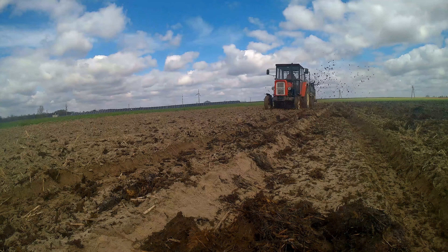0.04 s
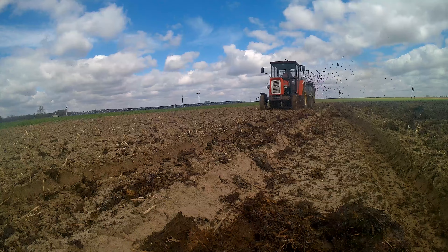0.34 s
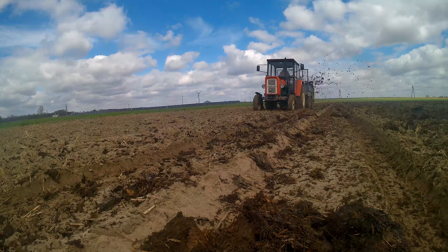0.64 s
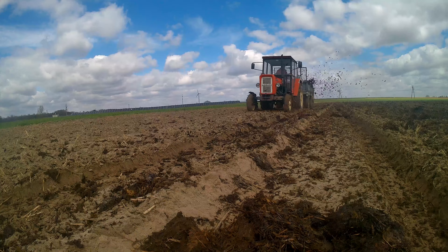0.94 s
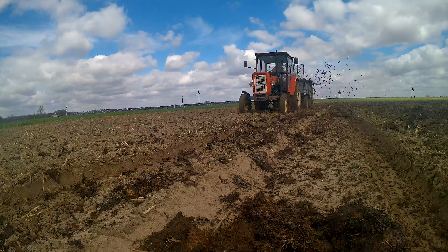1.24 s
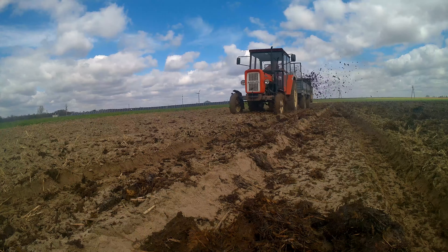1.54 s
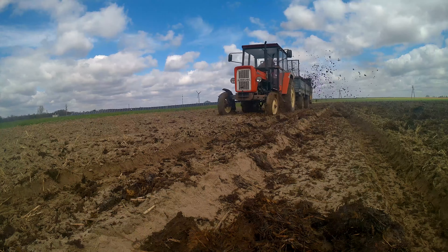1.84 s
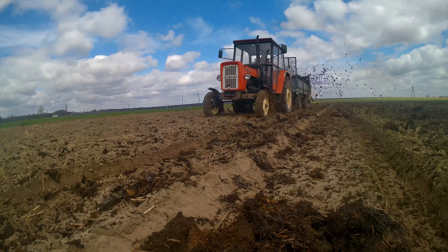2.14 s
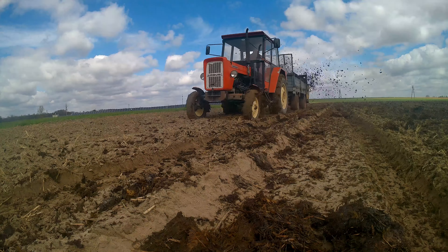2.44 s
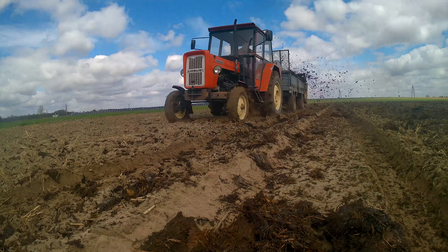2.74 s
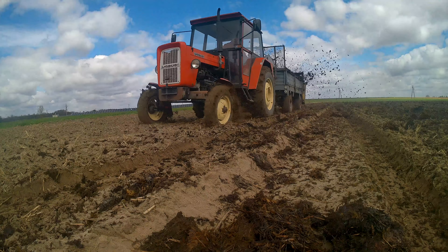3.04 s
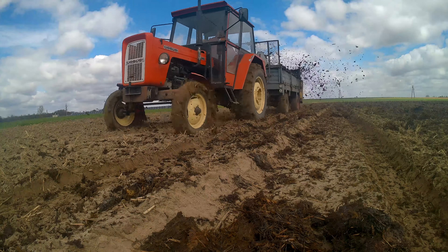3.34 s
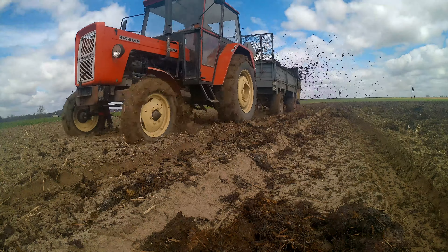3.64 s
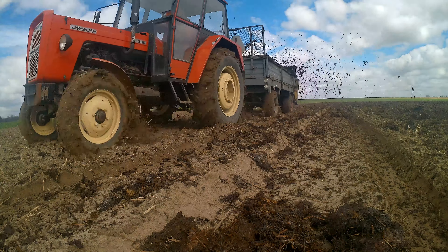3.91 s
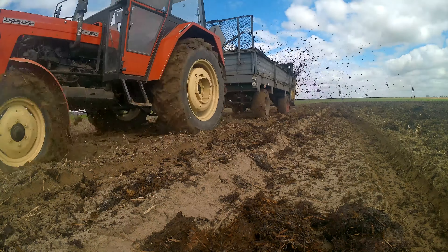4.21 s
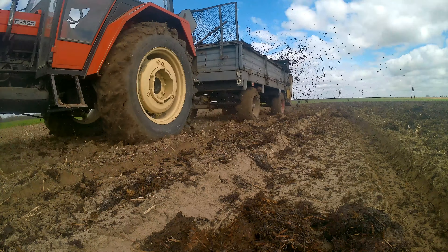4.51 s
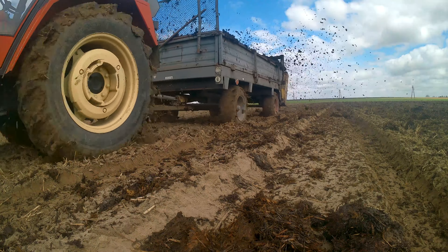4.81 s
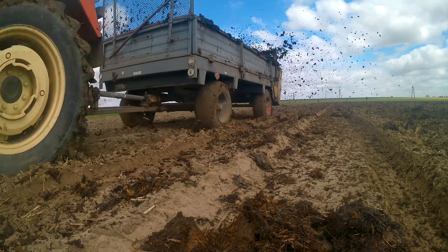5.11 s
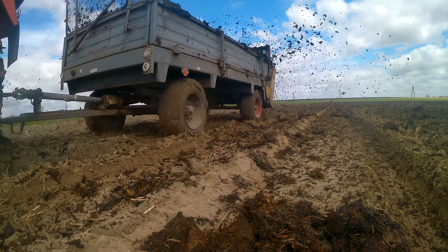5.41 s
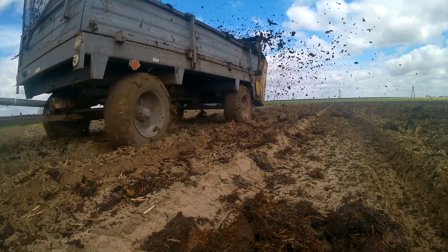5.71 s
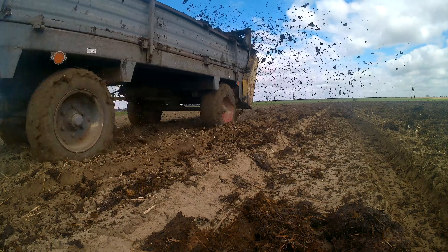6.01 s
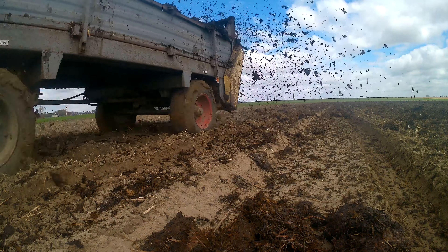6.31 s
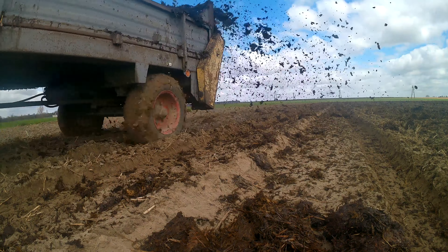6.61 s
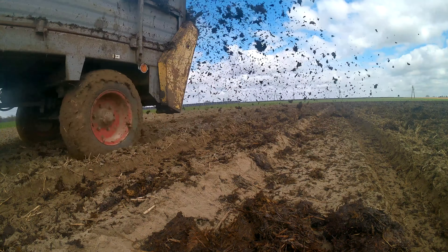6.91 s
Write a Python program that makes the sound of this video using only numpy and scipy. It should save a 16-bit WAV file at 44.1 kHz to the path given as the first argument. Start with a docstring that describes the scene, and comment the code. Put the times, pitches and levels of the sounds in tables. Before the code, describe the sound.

Heard from ground level in an open field with faint wind, a tractor's diesel engine drones and rattles steadily closer. As it goes by a few metres away, the tone changes and drops slightly. A towed spreader follows and dulls the engine sound, bringing a low rumble, churning beaters and crunching soil. Near the end, several flung clods spatter and thud close by.

```python
"""Tractor and manure spreader passing

Open field, light breeze, microphone on the ground. A four-cylinder diesel drives up under load and
passes about 2.5 m away: the exhaust drones, the block knocks, the injectors clatter. Its colour changes
as it goes by and its pitch sags with the load. The towed spreader then hides the engine: its beaters
churn, its body rumbles and clods drop on the soil."""
import sys
import numpy as np
from scipy import signal
from scipy.fft import rfft, irfft, next_fast_len
from scipy.io import wavfile
from scipy.ndimage import map_coordinates

SR = 44100
rng = np.random.default_rng(int(sys.argv[2]) if len(sys.argv) > 2 else 0)


def wrap_up_sound(samples):
    """Save the sound to the file named by the first command line argument, as 16-bit audio."""
    columns = np.atleast_2d(samples).T
    # keep every value between -1 and 1, then stretch to whole-number steps
    tamed = np.clip(columns, -1, 1)
    steps = np.round(tamed * 32767).astype(np.int16)
    wavfile.write(sys.argv[1], SR, steps)


N = 306495
DRIVE_M_PER_S = 1.806
ENGINE_PASS_S, ENGINE_MISS_M = 4.38, 2.485  # when and how near it passes the microphone
SPREADER_PASS_S, SPREADER_MISS_M = 6.5, 3.73
RUMBLE_DB, CHURN_DB, CRUNCH_DB = -32, -29, -40.3  # the spreader at its nearest
WALL_S, WALL_HALF_S = 5.5, 0.18  # the trailer's front wall faces the microphone
TOP_HZ = 15720

# Engine speed holds, then sags under the load. Each row: time in seconds, firings per second.
FIRING_RATE = [(0.0, 75.95), (0.6, 75.21), (1.5, 74.97), (2.5, 75.97), (3.0, 76.08), (3.6, 76.94),
               (4.15, 76.88), (4.65, 70.73), (5.3, 70.54), (5.55, 71.95), (5.85, 68.64), (6.95, 67.71)]
# Weak exhaust lines from unequal cylinders. Each row: multiple of the firing rate, then level in dB
# against the firing tone from far ahead, close ahead and behind.
SIDE_ORDERS = [(.5, -25, -31, -24), (.75, -28, -24, -27), (1.25, -19, -21, -16), (1.5, -20, -21, -17.5),
               (1.75, -22, -20.5, -13.5), (2.25, -24.5, -25, -19.5), (2.5, -24.5, -23, -24),
               (2.75, -27, -23.5, -22.5), (3, -25, -27, -19), (4, -28, -29, -20.5), (4.5, -30, -17.5, -25),
               (4.75, -24, -32, -23.5), (5.5, -28.5, -25.5, -36), (7.75, -31, -23, -23.5),
               (8.75, -25, -25, -35), (9.75, -23, -23, -32), (8, -32, -29, -26.5), (10.75, -39, -17.5, -32)]
# The cylinders in firing order. Each row: relative bark, knock and clatter in dB.
CYLINDERS = [(-7.5, -3, -4), (-1.5, -4.5, -3.5), (-7.5, -4.5, -3), (-4, -8, -4)]
# Extra hard combustions. Each row: start in seconds, level in dB.
HARD_KNOCKS = [(1.500, -13), (1.716, -16), (2.191, -12), (2.459, -13), (2.513, -10), (3.454, -7),
               (3.506, -5.5), (3.75, -14), (4.012, -10), (4.130, -6), (5.180, -11)]
# The block's ring. Each row: pitch in Hz, relative level in dB, seconds to fall 60 dB.
BLOCK_MODES = [(1360, -20, .035), (1556, 4.5, 0.037), (1670, -2, 0.015)]
# Tin covers and fuel pipes ringing with the clatter. Each row: pitch in Hz, width in Hz, relative dB.
TIN_MODES = [(3032, 143, -10), (3385, 62, -8.5), (4540, 55, -3), (6140, 240, 0), (6770, 210, 2.5),
             (7470, 170, 2), (9060, 300, -6)]

# Side facing the microphone. Each row: time in seconds, side (0 far ahead, 1 close ahead, 2 abreast,
# 3 behind).
VIEW = [(2.15, 0), (3.35, 1), (4.1, 1.36), (4.38, 2), (4.65, 2), (5, 3)]
# Exhaust bark, block knock and injector clatter from each side. Each row: frequency in Hz, relative dB.
BARK_FAR = [(110, -65), (190, -19), (232, -23), (259, -23), (290, -8.5), (375, -6.5), (405, 0.5),
            (454, -17.5), (716, -2.5), (829, 0.5), (930, -13.5), (1200, -8), (1560, -41), (2640, -120)]
BARK_CLOSE = [(110, -41), (190, -8), (220, -4), (259, -15), (349, 0), (451, -11), (581, -3), (699, -6.5),
              (835, 1), (997, -9.5), (1200, -7), (1560, -30), (2640, -120)]
BARK_ABREAST = [(110, -35), (190, -5), (247, -13), (302, 0), (360, -9), (398, 1), (437, -23), (476, -5.5),
                (804, -6), (974, -18.5), (1200, -1.5), (1560, -19), (2640, -120)]
BARK_BEHIND = [(110, -34), (190, -14), (217, 2), (243, -13), (279, -8), (344, 1), (414, -19), (564, 0),
               (861, -1), (1200, -3), (1560, -20), (2640, -120)]
KNOCK_FAR = [(620, -30.5), (1050, -17.5), (1170, -13.5), (1320, -4), (1430, -9), (1530, -7.5), (1620, 1.5),
             (1850, -10.5), (2130, -10.5), (2510, -25.5), (2700, -21), (3510, -42), (5940, -120)]
KNOCK_CLOSE = [(620, -35), (1050, -18), (1350, -1), (1440, -7.5), (1600, 4.5), (1690, 0), (1890, -14),
               (2050, -8.5), (2160, -16), (2520, -19), (2700, -24), (3510, -16), (5940, -120)]
KNOCK_ABREAST = [(620, -43), (1050, -9.5), (1140, -11), (1230, -17), (1370, 2), (1580, -8.5), (1800, -16),
                 (2020, -12.5), (2490, -24.5), (2700, -21), (3510, -38), (5940, -120)]
KNOCK_BEHIND = [(620, -49.5), (1050, -13.5), (1160, -7.5), (1360, -0.5), (1810, -10), (1900, -3),
                (2000, -9), (2360, -11.5), (2550, -45), (2700, -17.5), (3510, -30), (5940, -120)]
CLATTER_FAR = [(1500, -55), (2550, -17), (2970, 1.5), (3350, 3), (4170, -12), (4570, -11), (4860, -23),
               (5610, -22), (6100, -18), (7100, -41), (9040, -25), (9830, -38), (10600, -28), (12000, -42),
               (15600, -47)]
CLATTER_CLOSE = [(1500, -28.5), (2550, -17.5), (3110, 3), (3610, -5.5), (4680, -13.5), (5280, -29),
                 (6010, -22), (6630, -27), (7540, -24.5), (8130, -29), (8580, -24.5), (10100, -44),
                 (11900, -43), (12900, -52), (15600, -49)]
CLATTER_ABREAST = [(1500, -43), (2550, -11), (2810, 2.5), (3230, -4), (3590, -3.5), (4240, -1.5),
                   (5080, -17), (6050, -18.5), (6830, -29), (7540, -28), (8260, -40), (10400, -28.5),
                   (12200, -34), (12900, -36), (15600, -52)]
CLATTER_BEHIND = [(1500, -6), (2550, -30), (2860, 3.5), (3320, -10), (3590, -8.5), (4210, -2), (4860, -6.5),
                  (5530, -17.5), (6530, -21.5), (8320, -29.5), (10100, -27), (10900, -31.5), (11900, -33),
                  (13400, -46), (15600, -43)]
# Colours of the pipe mouth and the valve gear. Each row: frequency in Hz, relative dB.
PIPE_CRACK = [(300, -11.5), (600, -4.5), (950, -6.5), (1350, 4.5), (1700, -4.5), (2100, -4.5),
              (2600, -20.5), (4000, -24)]
VALVE_TICK = [(4500, -3.5), (6100, -4), (7500, -0.5), (8200, -7.5), (9200, -7.5), (10800, -14),
              (12000, -17), (13000, -28), (15700, -28)]
# What each engine part sends out, as at the nearest distance. Each row: level in dB to far ahead,
# close ahead, abreast and behind.
RADIATES = {"tone": (-17.5, -16.5, -20, -17.3), "octave": (-26.3, -20.5, -25, -26),
            "bark": (-29.3, -26.6, -24.2, -25.4), "knock": (-20.5, -17, -18.5, -16),
            "clatter": (-28.3, -24.5, -29, -26.5), "valves": (-49.3, -43.5, -52, -53)}
# How obstacles act on each part. Each row: share of a wheel's shadow, lift from the trailer's front
# wall in dB, loss behind the trailer in dB.
OBSTACLES = {"tone": (0.92, .8, 9.3), "octave": (0.85, 8.4, 7), "bark": (0.32, 0, 15),
             "knock": (.5, 3, 11.3), "clatter": (0.25, -.5, 17), "valves": (0.31, -.5, 16)}
# Wheels and axles cross the path to the microphone. Each row: centre and half length in seconds,
# full shadow in dB.
WHEEL_SHADOWS = [(3.82, .08, 2.4), (4.37, 0.12, 5.5), (4.706, .09, 3.5), (6.12, .07, 8), (6.34, .06, 8),
                 (6.783, 0.085, 10)]
# The trailer slides in front of the engine. Each row: time in seconds, share hidden.
TRAILER_COVER = [(5.05, 0), (5.86, .4), (5.95, 1)]

# Colours of the spreader's body, beaters and tyres. Each row: frequency in Hz, relative dB.
BODY_RUMBLE = [(50, -59), (85, -6), (140, 1), (221, -8), (329, -7), (367, -12), (436, -7.5), (562, -15.5),
               (650, -26), (840, -41), (1430, -120)]
BEATER_CHURN = [(340, -43), (580, -10.5), (639, -25), (673, -9.5), (785, -15.5), (842, -5.5), (971, -12),
                (1200, -7.5), (1310, 0.5), (1680, -6.5), (1900, -3), (2180, -4.5), (2700, -23), (3510, -41),
                (5940, -120)]
TYRE_CRUNCH = [(1500, -32), (2550, -18), (2970, 4), (3230, -1.5), (3930, -0.5), (4750, -4), (5120, -10),
               (5740, -15.5), (6290, -7), (6780, -14), (7710, -23), (8770, -26), (9760, -27.5),
               (12200, -30), (15600, -39)]
# The spreader swells twice: first rumble and churn surge with the load, then a tyre crunches past.
# Each row: centre and half length in seconds, then extra rumble, churn and crunch in dB.
SPREADER_SWELLS = [(6.168, 0.18, 4, 4.5, 1), (6.807, 0.065, 2, 1, 3)]
# Clods landing. Each row: start in seconds, level in dB, offset for the thump in dB.
CLODS = [(6.032, -27, -10), (6.099, -35.5, 14), (6.514, -34, 5), (6.631, -39, 20), (6.765, -36, 17)]
# The breeze lulls and freshens. Each row: time in seconds, level in dB.
BREEZE = [(1.8, -41.5), (2.5, -46), (4.6, -38)]
# Colour of wind on the microphone. Each row: frequency in Hz, relative dB.
WIND_BUFFET = [(7.1, -32), (12, -17), (38, -13), (55, -7), (72, -24), (120, -120)]


def exhaust(turns):
    """The pipe's drone: firing tone, octave and weak lines from the unequal cylinders."""
    tone_gain, octave_gain = amp(heard_db("tone")), amp(heard_db("octave"))
    view, = curves(VIEW)
    # behind the trailer the drone arrives by shifting detours and wavers
    angle = 2 * np.pi * (turns + 0.007 * wobble(20) + 0.05 * covered() * wobble(25))
    # from ahead the wave has sharp troughs, from behind sharp crests
    skew = np.pi * np.clip(2 - view, 0, 1)
    drone = tone_gain * np.cos(angle) + octave_gain * np.cos(2 * angle - skew)
    lines = 0
    for order, *levels in SIDE_ORDERS:
        db = np.interp(view, [0, 1, 3], levels) + 1.5 * wobble(3.99)
        lines += amp(db) * np.cos(order * angle + 2 * np.pi * rng.random())
    return np.sqrt(2) * (drone + tone_gain * lines)


def engine(turns):
    """Every firing barks from the pipe, knocks the block and rattles the injectors."""
    bark_db, knock_db, clatter_db = np.transpose(CYLINDERS)
    bark = firings(turns, bark_db, lag=.04, t60=.033, rise=.00076, scatter_db=.5, jitter=4e-5, alike=.77)
    bark = scattered(bark, ahead=0.043, behind=0.13, t60=0.053)
    bark = passing(bark, "bark", [BARK_FAR, BARK_CLOSE, BARK_ABREAST, BARK_BEHIND])
    knock = firings(turns, knock_db, lag=.3, t60=.046, rise=.0043, scatter_db=.7, jitter=6e-5, alike=.35)
    knock = scattered(knock, ahead=0.049, behind=0.22, t60=0.09)
    knock = passing(knock, "knock", [KNOCK_FAR, KNOCK_CLOSE, KNOCK_ABREAST, KNOCK_BEHIND])
    clatter = firings(turns, clatter_db, lag=.16, t60=.04, rise=.0061,
                      scatter_db=1.22, jitter=.0004, alike=.077)
    clatter = scattered(clatter, ahead=0.095, behind=0.37, t60=0.067)
    clatter += 1.25 * ringing(clatter, TIN_MODES)
    clatter = passing(clatter, "clatter", [CLATTER_FAR, CLATTER_CLOSE, CLATTER_ABREAST, CLATTER_BEHIND])
    return bark + knock + clatter


def cracks(turns):
    """Heard from behind, the pipe cracks, harder on every other firing."""
    facing = np.clip(curves(VIEW)[0] - 2, 0, 1)
    sizes_db = np.array([-3.5, 0.0, -4, -2.5])
    pulses = firings(turns, sizes_db, lag=-.03, t60=.012, rise=.0006, scatter_db=.8, jitter=5e-5, alike=.5)
    return facing * amp(heard_db("knock") - 3.5) * coloured(pulses, PIPE_CRACK)


def hard_knocks():
    """Now and then a charge ignites late and rings the block."""
    s, db = np.transpose(HARD_KNOCKS)
    t = np.arange(SR // 10) / SR
    phases = 2 * np.pi * rng.random((len(s), len(BLOCK_MODES)))
    ring = sum(amp(level - 60 * t / t60) * np.sin(2 * np.pi * hz * t + phases[:, [i]])
               for i, (hz, level, t60) in enumerate(BLOCK_MODES))
    ring *= 1 - np.exp(-t / 0.002)
    ring /= np.abs(ring).max(axis=1, keepdims=True)
    return placed(s * SR, amp(db - 0.8)[:, None] * ring)


def valves(turns):
    """Inlet and outlet valves tick after every firing."""
    sizes_db = np.transpose(CYLINDERS)[2]
    tick = dict(rise=.0015, scatter_db=2, jitter=.0006, alike=0)
    inlet = firings(turns, sizes_db, lag=.3, t60=.011, **tick)
    outlet = firings(turns, sizes_db, lag=.58, t60=.01, **tick)
    return amp(heard_db("valves")) * coloured(inlet + 0.83 * outlet, VALVE_TICK)


def spreader():
    """Under 4 m off at its nearest: the body rumbles, the beaters churn the load, tyres crunch soil."""
    more_rumble, more_churn, more_crunch = sum(np.outer(lifts_db, swell(s, half_s))
                                               for s, half_s, *lifts_db in SPREADER_SWELLS)
    rumble = amp(RUMBLE_DB + more_rumble + .3 * wobble(14))
    rumble *= coloured(grains(rate=2500, spread_db=1), BODY_RUMBLE)
    churn = amp(CHURN_DB + more_churn + .67 * wobble(60))
    churn *= coloured(grains(rate=4000, spread_db=1), BEATER_CHURN)
    crunch = amp(CRUNCH_DB + more_crunch + .6 * wobble(60))
    crunch *= coloured(grains(rate=9000, spread_db=3), TYRE_CRUNCH)
    return (rumble + churn + crunch) * amp(distance_db(SPREADER_PASS_S, SPREADER_MISS_M))


def clods():
    """Each clod lands with a short spatter and a soft thump."""
    s, db, thump_db = np.transpose(CLODS)
    t = np.arange(SR // 10) / SR
    spatter = placed(s * SR, amp(db[:, None] - 60 * t / .04) * rng.standard_normal((len(s), len(t))))
    spatter = signal.sosfilt(signal.butter(2, [2500, 6500], "band", fs=SR, output="sos"), spatter)
    thump = amp((db + thump_db)[:, None] - 60 * t / 0.031) * np.sin(2 * np.pi * 190 * t)
    return 0.77 * spatter + placed(s * SR, thump)


def wind():
    """A light breeze buffets the microphone."""
    return amp(curves(BREEZE)[0] + 2.2 * wobble(9.2)) * coloured(rng.standard_normal(N), WIND_BUFFET)


def hiss():
    """The microphone's own faint hiss."""
    return amp(-68) * rng.standard_normal(N)


def firings(turns, sizes_db, lag, t60, rise, scatter_db, jitter, alike, size=1500):
    """One noise burst per firing; lag is in firings, t60, rise and jitter in seconds."""
    firing = np.arange(1, int(turns[-1]))
    cylinder = firing % len(sizes_db)
    t = np.arange(size) / SR
    phases = 2 * np.pi * rng.random((len(sizes_db), size // 2 + 1))
    own_shape = irfft(np.exp(1j * phases)) * np.sqrt(size)
    chance = rng.standard_normal((len(firing), size + 2))
    # each cylinder repeats its own shape for the share `alike` of the power
    bursts = np.sqrt(alike) * own_shape[cylinder] + np.sqrt(1 - alike) * chance[:, 2:]
    gains = amp(sizes_db[cylinder] + scatter_db * chance[:, 0])
    starts = np.interp(firing + lag, turns, np.arange(N)) + jitter * SR * chance[:, 1]
    envelope = np.exp(-np.log(1000) * t / t60) * (1 - np.exp(-t / rise))
    return placed(np.abs(starts), gains[:, None] * bursts * envelope)


def scattered(x, ahead, behind, t60):
    """Soil, wheels and the trailer's wall smear a share of the pulses, most once the tractor is by."""
    t = np.arange(SR // 10) / SR
    power = np.abs(signal.oaconvolve(x ** 2, amp(-120 * t / t60) * t)[:N])
    smear = unit(np.sqrt(power) * rng.standard_normal(N))
    share = np.interp(curves(VIEW)[0], [1, 2], [ahead, behind])
    return np.sqrt(1 - share) * unit(x) + np.sqrt(share) * smear


def passing(x, part, spectra):
    """An engine part going by: its level changes and each side's colour fades into the next."""
    view, = curves(VIEW)
    blend = sum(np.clip(1 - abs(view - side), 0, 1) * coloured(x, spectrum)
                for side, spectrum in enumerate(spectra))
    return amp(heard_db(part)) * blend


def heard_db(part):
    """An engine part's level at the microphone: the side it shows, its distance, what is in the way."""
    side_db = np.interp(curves(VIEW)[0], range(4), RADIATES[part])
    wheel_share, wall_db, hidden_db = OBSTACLES[part]
    wheels_db = sum(db * swell(s, half_s) for s, half_s, db in WHEEL_SHADOWS)
    obstacles_db = wall_db * swell(WALL_S, WALL_HALF_S) - wheel_share * wheels_db - hidden_db * covered()
    return side_db + distance_db(ENGINE_PASS_S, ENGINE_MISS_M) + obstacles_db


def distance_db(pass_s, miss_m):
    """Level of a source driving by in a straight line, relative to its nearest point."""
    along_m = DRIVE_M_PER_S * (np.arange(N) / SR - pass_s)
    return 20 * np.log10(miss_m / np.hypot(along_m, miss_m))


def covered():
    """Share of the engine that the trailer hides."""
    return curves(TRAILER_COVER)[0]


def ringing(x, modes):
    """x heard through a set of resonances."""
    return sum(amp(db) * signal.lfilter(*signal.iirpeak(hz, hz / width, fs=SR), x)
               for hz, width, db in modes)


def grains(rate, spread_db):
    """Random impacts of uneven size, rate a second, at rms 1."""
    hits = rng.random(N) < rate / SR
    return unit(hits * rng.standard_normal(N) * amp(spread_db * rng.standard_normal(N)))


def coloured(x, spectrum, size=8192):
    """x through a causal filter with the given (Hz, dB) shape, at rms 1."""
    hz, db = np.transpose(spectrum)
    grid = np.log(np.fft.rfftfreq(size, 1 / SR) + 1)
    outside = np.maximum(np.log(hz[0]) - grid, 0) + np.maximum(grid - np.log(hz[-1]), 0)
    shape_db = np.maximum(np.interp(grid, np.log(hz), db) - 80 * outside, -100)
    cepstrum = irfft(np.log(amp(shape_db)))
    cepstrum[1:size // 2] *= 2  # fold to minimum phase
    cepstrum[size // 2 + 1:] = 0
    return unit(signal.oaconvolve(x, irfft(np.exp(rfft(cepstrum))))[:N])


def placed(starts, sounds):
    """Sum rows of sound, each beginning at its start sample."""
    index = np.round(starts).astype(int)[:, None] + np.arange(sounds.shape[1])
    return np.bincount(index.ravel(), sounds.ravel(), N)[:N]


def curves(rows):
    """One value per sample for each column after the time."""
    s, *cols = np.transpose(rows)
    return [np.interp(np.arange(N) / SR, s, c) for c in cols]


def wobble(rate):
    """A smooth random curve, rate knots a second."""
    knots = rng.standard_normal(int(N * rate / SR) + 4)
    return map_coordinates(knots, [np.arange(N) * rate / SR])


def swell(s, half_s):
    """A bell of height 1 around time s."""
    return np.exp(-((np.arange(N) / SR - s) / half_s) ** 2)


def amp(db):
    """Decibels to gain."""
    return 10 ** (np.asarray(db) / 20)


def unit(x):
    """Scale to rms 1."""
    return x / np.sqrt(np.mean(x ** 2) + 1e-20)


def scene():
    """Tractor, spreader and breeze at one microphone in the open field."""
    turns = .39 + np.cumsum(curves(FIRING_RATE)[0]) / SR  # crank position, counted in firings
    tractor = exhaust(turns) + cracks(turns) + engine(turns) + valves(turns) + hard_knocks()
    return (tractor + spreader() + clods() + wind() + hiss())[None]


def record(dry):
    """The recorder clips at full scale and keeps nothing above its band limit."""
    size = next_fast_len(N + SR // 4)
    in_band = np.fft.rfftfreq(size, 1 / SR) < TOP_HZ
    return irfft(rfft(np.clip(dry, -1, 1), size) * in_band, size)[:, :N]


dry = scene()
out = record(dry)
wrap_up_sound(out)
```